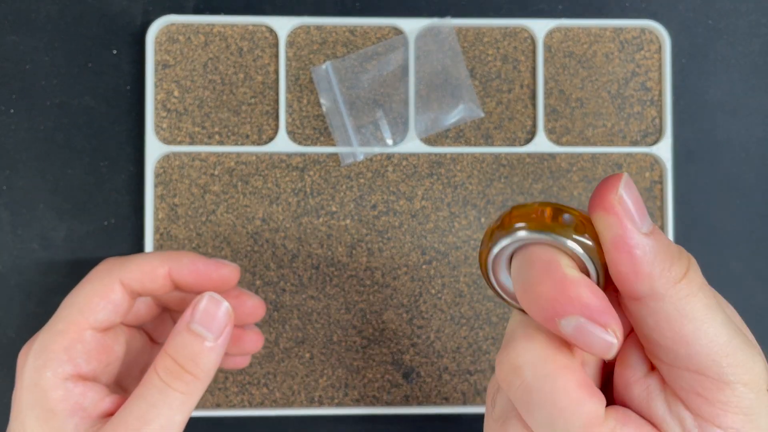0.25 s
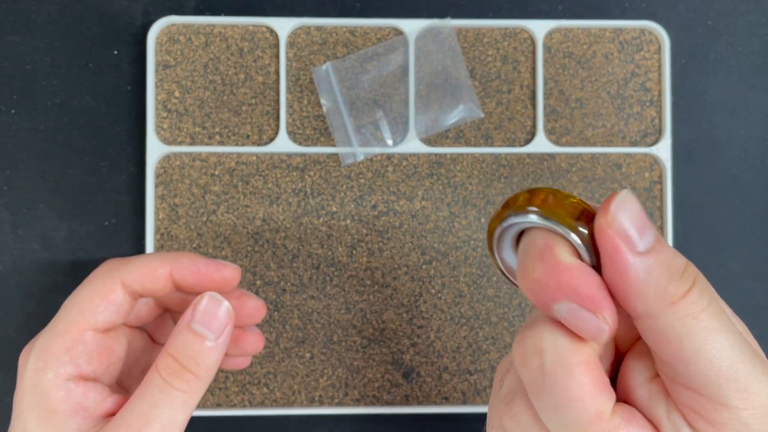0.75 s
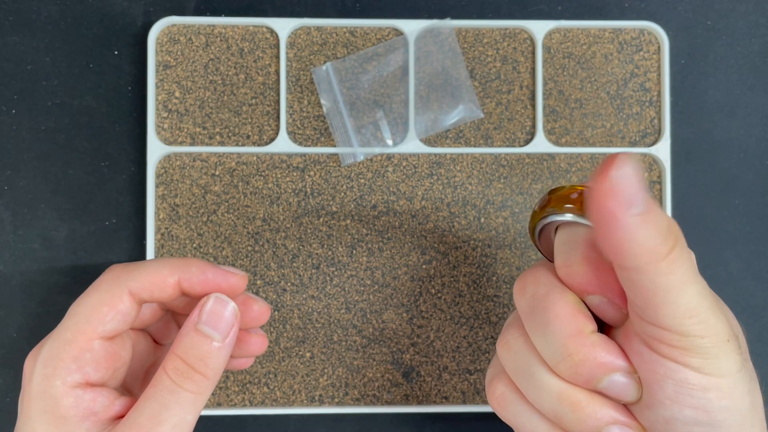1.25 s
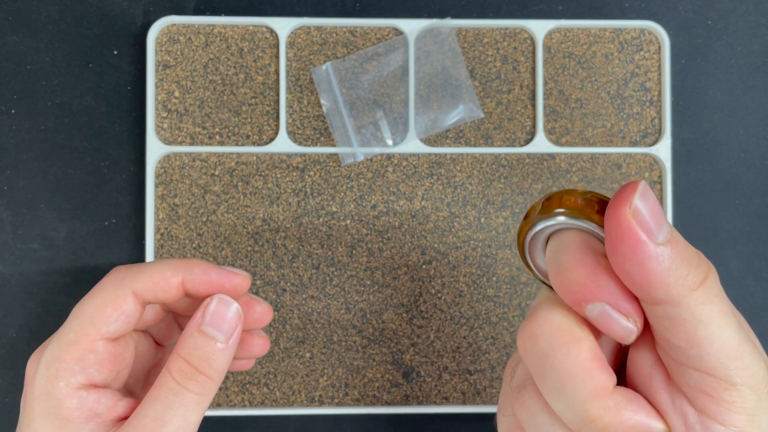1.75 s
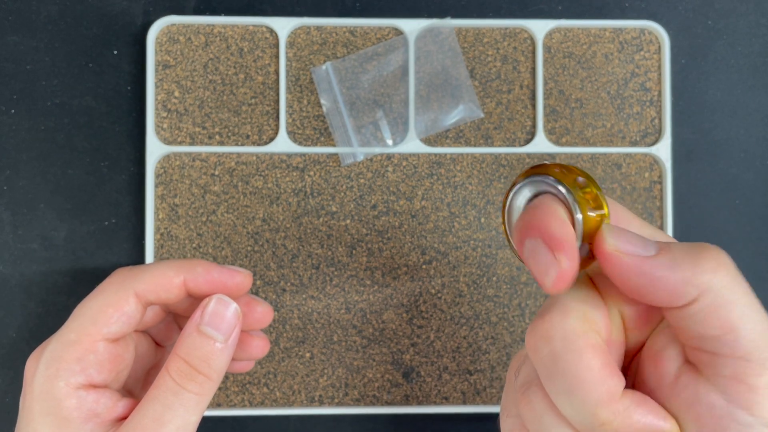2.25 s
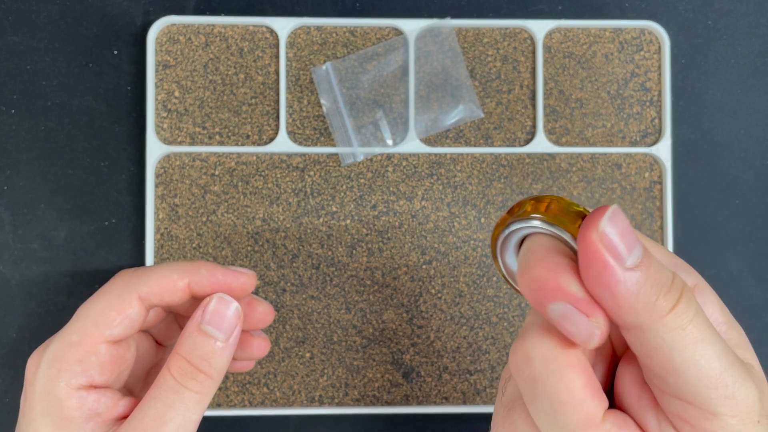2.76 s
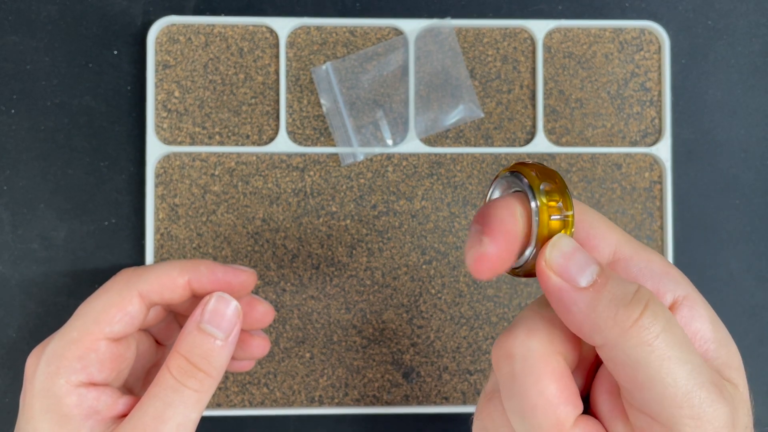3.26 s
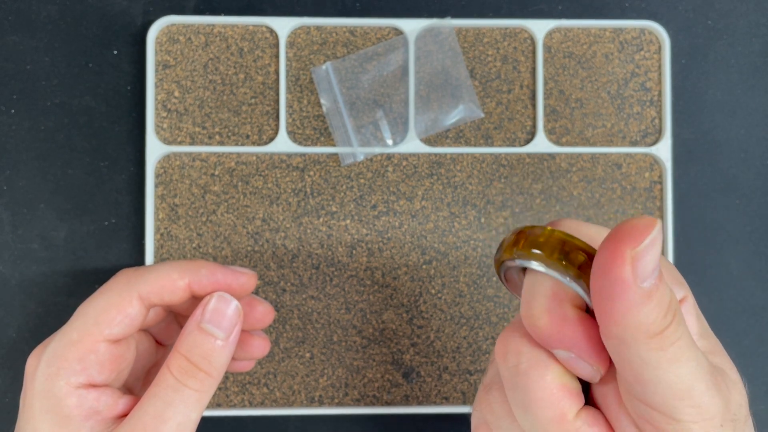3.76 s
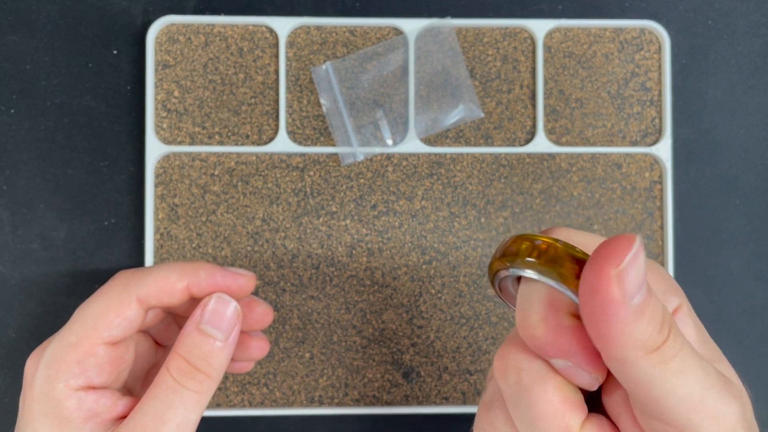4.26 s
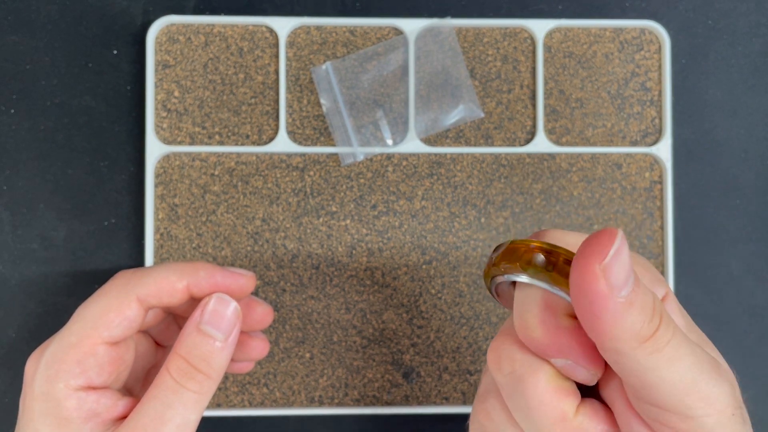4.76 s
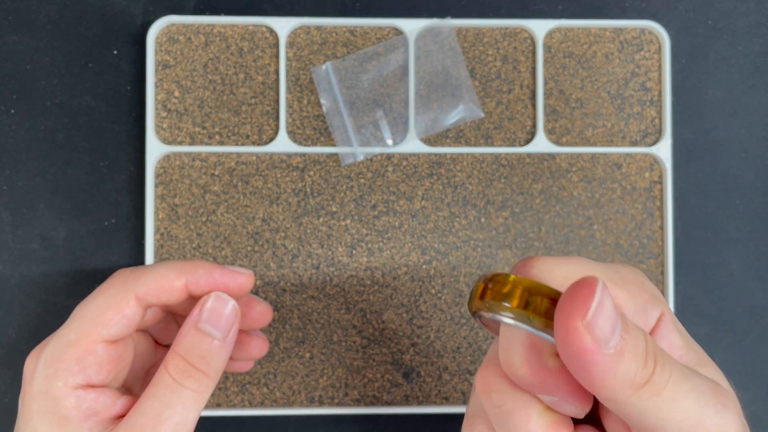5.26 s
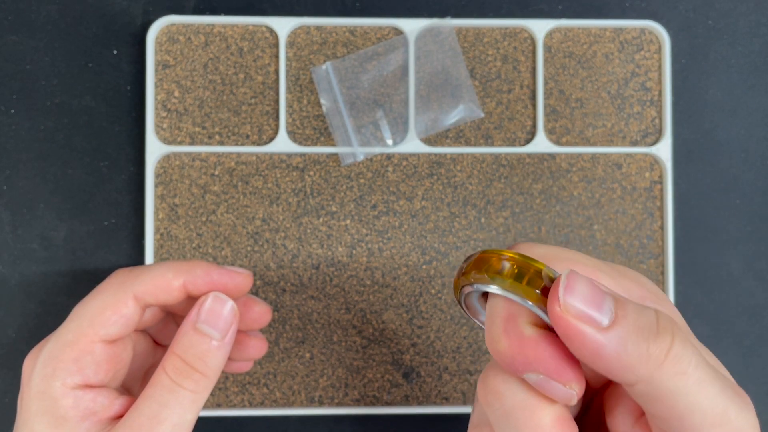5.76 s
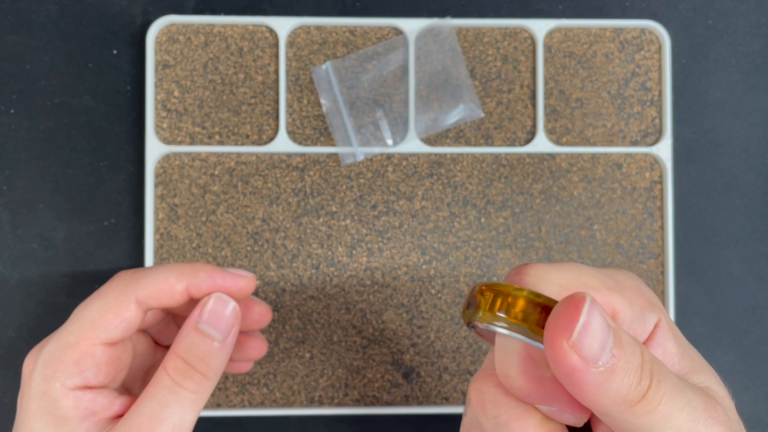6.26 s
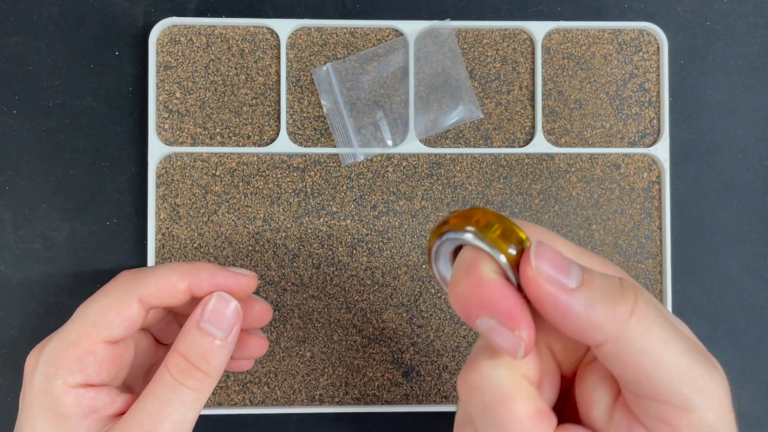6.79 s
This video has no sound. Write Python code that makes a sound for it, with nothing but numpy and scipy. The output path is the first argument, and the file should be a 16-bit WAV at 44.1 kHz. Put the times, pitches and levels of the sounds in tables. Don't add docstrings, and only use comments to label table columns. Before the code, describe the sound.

Close, sharp, dry clicks from a small clicker ring run in quick uneven flurries, broken by brief gaps of faint room tone.

```python
import sys
import numpy as np
from scipy import signal
from scipy.fft import rfft, irfft, next_fast_len
from scipy.io import wavfile
from scipy.ndimage import uniform_filter1d, map_coordinates

SR = 44100
rng = np.random.default_rng(int(sys.argv[2]) if len(sys.argv) > 2 else 0)


def to_linear_factor(level_db):
    exponent = np.asarray(level_db, float) / 20
    return 10 ** exponent


def generate_wav(sig):
    pcm = np.round(np.clip(np.atleast_2d(sig).T, -1, 1) * 32767).astype(np.int16)
    wavfile.write(sys.argv[1], SR, pcm)


N = 309889


def along(points, hz):
    f, v = np.transpose(points)
    return np.interp(np.log(hz + 1), np.log(f + 1), v)


def unit(x):
    return x / np.sqrt(np.mean(x ** 2, axis=-1, keepdims=True) + 1e-20)


def filtered(x, response):
    m = next_fast_len(N + SR // 2)
    hz = np.fft.rfftfreq(m, 1 / SR)
    return irfft(rfft(x, m) * response(hz), m)[..., :N]


def add(track, seconds, rows):
    for s, row in zip(seconds, rows):
        i = max(round(s * SR), 0)
        track[..., i:i + row.shape[-1]] += row[..., :max(N - i, 0)]
    return track


# (time [s], rumble level [dB], murmur level [dB])
ROOM_TONE = [(0.0, -56, -72.5), (0.35, -61.5, -78.5), (0.49, -69.5, -90), (1.08, -76, -88),
             (1.72, -74, -86.5), (1.94, -70.5, -79.5), (2.25, -81, -87.5), (3.4, -67, -77.5),
             (3.52, -60.5, -70), (3.68, -71, -87.5), (3.83, -76, -88.5), (4.99, -72.5, -83.5),
             (5.21, -66, -90.5), (5.52, -72, -88), (6.05, -60.5, -71.5), (6.5, -63.5, -81),
             (7.03, -59.5, -73)]
# (frequency [Hz], level [dB per Hz])
RUMBLE_COLOUR = [(32, -42.5), (46, -7), (62, 1.5), (140, -6.5), (215, -16), (400, -52)]
# (frequency [Hz], level [dB per Hz])
MURMUR_COLOUR = [(120, -11), (250, -8.5), (600, -9.5), (1200, -25), (2000, -44.5)]
# (frequency [Hz], level [dB per Hz])
HISS_COLOUR = [(500, -5), (1500, -0.5), (8700, -8.5), (11400, -12), (16000, -20)]


def air():
    def noise(colour):
        return unit(filtered(rng.standard_normal((2, N)), lambda f: to_linear_factor(along(colour, f))))

    s, rumble_db, murmur_db = np.transpose(ROOM_TONE)
    t = np.arange(N) / SR
    drift = map_coordinates(rng.standard_normal(N * 6 // SR + 4), [t * 6])
    rumble = to_linear_factor(np.interp(t, s, rumble_db) + 2.1 * drift) * noise(RUMBLE_COLOUR)
    murmur = to_linear_factor(np.interp(t, s, murmur_db)) * noise(MURMUR_COLOUR)
    return rumble + murmur + to_linear_factor(-89.0) * noise(HISS_COLOUR)


# (start [s], push level [dB], push growth [dB/s], bending over edge modes [dB])
STROKES = [(0, -44.5, -150, 4), (0.259, -27.5, -59.5, -3.5), (.66, -49, -45.5, -3),
           (1.361, -53.5, -48.5, -1), (1.689, -62.5, 27, -5), (1.96, -55.5, -1, -5.5),
           (2.52, -61.5, -1.5, -0.5), (2.679, -49.5, 6, -3.5), (3.34, -40, 10.5, 0),
           (3.509, -51.5, 14, -12.5), (4.04, -60.5, 3.5, -9.5), (4.521, -57.5, -30.5, -3.5),
           (4.98, -56.5, 28, -4), (5.68, -43.5, -29.5, -0.5), (5.919, -55, -17.5, -4), (6.16, -47, 60, -8),
           (6.87, -47, 89, -1.5)]


def stroke(s):
    starts = [row[0] for row in STROKES]
    start, push_db, grows_db, bend_db = np.array(STROKES)[np.searchsorted(starts, s) - 1].T
    return push_db + grows_db * (s - start), bend_db


# (time [s], leading bending mode [Hz], leading edge mode [Hz],
# extra bending [dB], extra push [dB])
HOLDS = [(0.019, 4130, 6220, 2.5, 1.5), (0.069, 4500, 6700, -8.5, -1.5),
         (0.172, 5230, 6950, -12, -3.5), (0.224, 5470, 6030, 7.5, -2), (0.28, 4230, 6790, -13.5, -1),
         (0.318, 4700, 6590, 11.5, 3.5), (0.353, 4890, 6160, -1.5, -2.5), (0.381, 5060, 6320, 3, 1),
         (0.418, 5120, 6240, -3.5, 0), (0.446, 4670, 5900, 4, -1), (0.47, 4740, 6540, -2.5, 0.5),
         (0.655, 5180, 6040, 6.5, -5), (0.673, 5230, 7200, 13.5, 1.5), (0.709, 5350, 7800, 4, 4),
         (0.744, 4940, 7300, -6.5, -1), (0.781, 5030, 7460, -5.5, -10), (0.811, 4970, 7600, 3, 2),
         (0.848, 5000, 7550, -6.5, 6.5), (0.887, 4480, 7430, -14, -2.5),
         (0.929, 4360, 6630, 3.5, -4.5), (0.977, 4450, 7320, 11.5, -2), (1.374, 3720, 5980, 4, 4),
         (1.41, 3880, 6010, 4.5, 2.5), (1.479, 4800, 6030, 0.5, 5), (1.521, 5230, 6730, 11.5, -10),
         (1.709, 4360, 6704, -1, -18.5), (1.732, 3730, 7640, 7, 0.5), (1.75, 4930, 6200, 3.5, 4),
         (1.788, 3990, 6120, -4.5, -10.5),
         (1.833, 4026, 6400, 1.5, 6), (1.883, 3785, 5980, -6, -0.5), (1.972, 4640, 6240, 1, -13),
               (2.021, 5270, 5810, 5, 8), (2.078, 5210, 6650, 3.5, 6), (2.107, 5210, 6850, 6.5, -1.5),
               (2.128, 5030, 6484, -12.5, -8), (2.491, 4726, 6070, 5.5, -3), (2.532, 4230, 6300, 10.5, 2.5),
               (2.575, 4390, 7300, 16.5, 12.5), (2.695, 4580, 6565, -7, -2), (2.713, 3950, 6870, 2.5, -6),
               (2.744, 4460, 6540, -1, 0), (2.783, 4160, 6600, -4.5, 0.5), (2.829, 4900, 7100, 8, -0.5),
               (2.873, 4780, 6360, 5.5, -4.5), (3.324, 4920, 6170, 7, 3), (3.354, 4920, 6160, 0.5, 2.5),
               (3.397, 4893, 5890, -3, 4), (3.434, 4984, 6130, 3.5, 4.5), (3.462, 5424, 7460, 10.5, 3),
               (3.487, 4580, 6130, -6.5, 2), (3.528, 5190, 6810, 1, 7.5), (3.579, 3380, 6955, -6, 3),
               (3.626, 3400, 6353, -2, 3.5), (3.669, 3404, 6236, 5, 0.5), (4.054, 3720, 6430, 4, -5),
         (4.096, 4100, 6060, -0.5, -3), (4.128, 3700, 6280, -2, 7), (4.153, 4040, 6220, 4.5, 2),
             (4.181, 4370, 6530, 8.5, -2.5), (4.221, 4970, 7510, -1.5, -2.5), (4.534, 4990, 6220, -12, 3.5),
             (4.552, 4580, 6980, 1, -4), (4.591, 4820, 7190, 3, -0.5), (4.62, 5100, 7610, -10.5, 1.5),
             (4.647, 4280, 6930, 2, 3), (4.676, 4300, 7330, 16, 9.5), (4.734, 4120, 7430, 4, 0.5),
             (4.989, 4870, 7540, 2, -8.5), (5.04, 3490, 6430, 5, 2.5), (5.067, 5000, 6340, 8.5, 6),
             (5.098, 3680, 7030, -9, -5), (5.124, 3700, 7470, -2, -2.5), (5.151, 3770, 7490, -4, -4),
             (5.187, 3660, 7780, 4, 1), (5.694, 3800, 6716, -17, 1), (5.802, 3880, 6366, -20, 2),
             (5.935, 4435, 6320, -3.5, 4), (6.018, 4300, 6700, 8, -2), (6.092, 4820, 6170, -12.5, 1.5),
             (6.172, 4870, 7410, -6.5, -1), (6.233, 4830, 7600, -5.5, 2), (6.294, 4360, 7560, -4, -0.5),
             (6.868, 5400, 7230, 10, 4), (6.891, 5330, 6920, 4, -1), (6.939, 4780, 7480, 5, 1.5),
             (7.01, 5380, 6860, 14, 0)]


def hold(s):
    table = np.array(HOLDS)
    nearest = np.abs(table[:, 0] - np.reshape(s, (-1, 1))).argmin(axis=1)
    return table[nearest, 1:].T


# (time [s], peak level [dB], resin over metal [dB], delay of second
# contact [ms], its peak level [dB])
NOTCH_CLICKS = [(0.019, -11, -3.5, 1.9, -17), (0.0686, -5.5, -11, 1.9, -24), (0.1715, -21.5, -15, 2.6, -32),
                (0.224, -31, -14.5, 2.4, -26), (0.2791, -11, -3, 3.7, -20), (0.3183, -14, -6, 1.4, -15.5),
                (0.3527, -10, 3, 4.1, -21), (0.3794, -9, -3, 1.6, -17.5), (0.418, -13, -2, 2.7, -22),
                (0.4452, -12, -0.5, 1.7, -14), (0.4697, -14, 0.5, 1.8, -17), (0.6726, -10.5, -1, 2.0, -8.5),
                (0.7089, -11, -2.5, 2.7, -15.5), (0.7437, -15, -5.5, 2.4, -11), (0.7806, -7, -13.5, 2.0, -15),
                (0.8103, -11.5, -6, 3.4, -13.5), (0.848, -9.5, -7, 2.5, -14), (0.886, -9, -7, 4.6, -13.5),
                (0.9295, -19.5, -3.5, 3.2, -11.5), (0.9771, -9.5, -10, 1.6, -16), (1.3737, -9, -13.5, 1.4, -22),
                (1.4093, -22, -11.5, 4.2, -24.5), (1.4792, -11.5, -6.5, 3.4, -15), (1.5208, -15, -23, 1.6, -31.5),
                (1.708, -14.5, 0, 1.1, -15.5), (1.731, -21.5, -10, 1.2, -27.5),
              (1.7489, -27, -12.5, 2.8, -37), (1.7861, -12.5, 7, 1.4, -16.5), (1.8334, -12, 11, 1.7, -14),
              (1.8836, -10, 6, 1.9, -14.5), (1.9716, -11.5, 1, 1.1, -11.5), (2.0214, -12, 2.5, 1.2, -18),
              (2.0775, -10.5, -3, 1.2, -20.5), (2.1071, -9, -2, 6.3, -28.5), (2.1282, -14.5, 4, 0.95, -12),
              (2.5317, -11.5, 2.5, 2.5, -32), (2.575, -26.5, -1.5, 1.3, -27),
              (2.6945, -13, 3.5, 1.6, -16.5), (2.7132, -19, -5, 2.0, -24.5), (2.7442, -10.5, 2.5, 0.9, -17),
              (2.7823, -12.5, 3.5, 1.0, -14.5), (2.829, -11.5, -5, 4.2, -16.5),
              (2.8736, -12, 1.5, 1.7, -15.5),
                (3.3534, -12.5, -4, 1.5, -13.5), (3.3967, -11, -5, 0.68, -10),
               (3.4336, -11.5, 2.5, 1.6, -18.5), (3.4613, -9, -2, 2.5, -15.5),
               (3.4871, -12.5, 0.5, 1.1, -7), (3.5277, -11.5, 3.5, 2.4, -12), (3.5793, -8.5, 2, 2.9, -11.5),
               (3.6262, -12, -1, 2.2, -10.5), (3.6685, -13, -0.5, 5.4, -13), (4.0534, -6, -4.5, 2.1, -12),
               (4.0964, -7, 0, 2.9, -15.5), (4.1279, -6, -3, 2.2, -13.5), (4.1528, -9, 3, 2.4, -17),
               (4.1814, -12.5, -6.5, 2.6, -11.5), (4.2213, -9.5, -6, 3.5, -18),
               (4.5342, -9.5, -7, 2.4, -14.5), (4.5523, -14.5, -7.5, 1.9, -7.5),
               (4.5876, -10, -11, 2.9, -7.5), (4.6173, -10, -8, 1.6, -11), (4.6468, -9, -10, 3.2, -15.5),
               (4.6759, -18.5, -0.5, 3.1, -11), (4.7313, -17.5, -2, 2.9, -14),
                (4.9881, -19, -19, 1.9, -31), (5.0016, -20, -10, 9.9, -33), (5.0412, -7.5, -9, 2.6, -23),
              (5.0665, -9.5, -6, 2.0, -16), (5.0976, -13.5, 2, 1.2, -14.5),
              (5.1236, -14.5, -6.5, 4.0, -11.5), (5.1496, -10, 1, 2.0, -13),
              (5.1879, -11, -5.5, 3.5, -11.5), (5.6936, -9.5, -1.5, 2.5, -18.5),
              (5.6998, -24.5, -5.5, 3.5, -16.5), (5.8011, -7, -7, 2.2, -20.5),
              (5.8106, -19.5, 0.5, 4.2, -22.5), (5.9327, -12.5, -1, 1.5, -15.5),
              (5.9444, -22.5, -2, 2.6, -19.5), (6.0177, -8.5, -6.5, 6.3, -15.5),
              (6.0921, -8.5, -5.5, 7.6, -13.5), (6.1726, -8, -8.5, 5.5, -14),
              (6.232, -10.5, -5.5, 1.3, -12.5), (6.293, -9.5, -3.5, 8.7, -14),
              (6.8885, -10.5, -6.5, 2.0, -12.5), (6.938, -12, -1, 2.9, -17),
              (7.0096, -10.5, -3, 2.5, -17.5)]
CLICKS = NOTCH_CLICKS
# (time [s], peak level [dB], resin over metal [dB])
TICKS = [(0.618, -49.5, 19), (0.629, -44, 7), (.642, -42.5, -4), (0.6545, -36.5, 7), (1.2476, -45, 29),
         (0.9886, -19.5, -7), (1.2729, -45, 11), (1.2884, -49, 7), (1.321, -47.5, 1), (1.3462, -53.5, 1),
         (1.4336, -44.5, 3.5), (1.551, -47.5, 25), (1.6892, -54, -4.5), (1.8009, -22.5, -6.5),
         (1.852, -24, -5.5), (1.91, -27.5, -1.5), (2.2606, -42, 2.5), (2.469, -47, 27), (2.491, -37.5, 3),
         (3.2817, -51, 7), (3.29, -43, 9), (3.325, -32.5, -11.5), (3.71, -40, 13.5), (4.0346, -43.5, 17),
         (4.5248, -31, 5.5), (6.5012, -58.5, 11), (6.508, -63, 7), (6.652, -57.5, 22), (6.869, -33, -5)]
TICKS_AND_LANDINGS = TICKS + [(.3217, -23, -6), (.8527, -15, -8), (.8892, -18, -7.5), (1.8401, -19, 4),
                      (1.9757, -16.5, 3.5), (2.0243, -14.5, -0.5), (4.2275, -19, -9), (5.1023, -14, -1),
                      (5.1312, -22.5, -0.5), (6.2377, -11, -7)]


def strikes():
    rattles, wait_s = 3, 0.002
    loss_db, scatter_db = 9.5, 5
    bend_scatter_db, second_bend_db = 0.5, 1.5
    s, db, resin_db, after_ms, second_db = np.transpose(CLICKS)
    chance = rng.standard_normal((len(s), 2 + 2 * rattles)).T
    bend_db = stroke(s)[1]
    drop = (s, db, resin_db, bend_db + bend_scatter_db * chance[0])
    landing = (s + after_ms / 1000, second_db, resin_db - 7.5,
               bend_db + second_bend_db + bend_scatter_db * chance[1])
    rows = [drop, landing]
    for k, (wait, scatter) in enumerate(chance[2:].reshape(rattles, 2, -1)):
        when = rows[-1][0] + wait_s * to_linear_factor(2 * wait)
        level = np.minimum(db, second_db) - loss_db * (k + 1) + scatter_db * scatter
        rows.append((when, level, resin_db + 0.5, bend_db + second_bend_db))
    ticks = np.transpose([(*tick, -2) for tick in TICKS_AND_LANDINGS])
    return np.hstack([np.array(row) for row in rows] + [ticks])


def modes(table, hz, spread_db, count):
    chance = rng.standard_normal((count, len(table), 2))
    total = 0
    for k, (centre, width, db) in enumerate(table):
        width = max(width, 450)
        c = centre * (1 + 0.018 * chance[:, k, :1])
        strength = (-1) ** k * to_linear_factor(db + spread_db * chance[:, k, 1:])
        total = total + strength * 1j * hz * width / (c * c - hz * hz + 1j * hz * width)
    return total


def even(body):
    return body / np.linalg.norm(body, axis=1, keepdims=True)


def blend(a, b, a_db):
    return (to_linear_factor(a_db) * even(a) - even(b)) / np.sqrt(1 + to_linear_factor(2 * a_db))


def bursts(count, t):
    size = len(t)
    rise = to_linear_factor(t / .000025) + to_linear_factor(-28 + t / .0002)
    fall = to_linear_factor(-t / 0.00016) + to_linear_factor(-18.0 - t / 0.00016)
    shape = np.where(t < 0, rise, fall)
    chatter = to_linear_factor(4.5 * unit(uniform_filter1d(rng.standard_normal((count, size)), size=12)))
    blow = 3.2 * (np.arange(size) == np.argmax(t >= 0)) * [[1], [0]]
    burst = rfft(rng.standard_normal((count, 2, size)) * (shape * chatter)[:, None] + blow)
    return burst / uniform_filter1d(np.abs(burst), size=15) ** .5


# (frequency [Hz], width [Hz], level [dB])
SHELL_BENDING = [(2600, 880, -15.5), (3500, 780, -7.5), (4166, 970, -0.5), (5007, 700, 1.5)]
# (frequency [Hz], width [Hz], level [dB])
SHELL_EDGE = [(6124, 440, -2.5), (6349, 570, 0.5), (7150, 330, -9)]
# (frequency [Hz], width [Hz], level [dB])
STEEL_RACE = [(8500, 1300, -7.5), (11050, 900, 1.5), (12000, 900, -4), (14350, 900, -10), (15350, 800, -10)]


def contacts():
    s, db, resin_db, deep_db = strikes()[:, :, None]
    count, size = len(s), 1024
    t = np.arange(size) / SR - .004
    hz = np.fft.rfftfreq(size, 1 / SR)
    burst = bursts(count, t)

    def lead(c, level_db):
        return to_linear_factor(level_db) * even(1j * hz / (c * c - hz * hz + 1j * hz * 360))

    bend_hz, edge_hz, extra_db, _ = hold(s)[:, :, None]
    bending = even(modes(SHELL_BENDING, hz, 5.5, count))
    edge = even(modes(SHELL_EDGE, hz, 2.0, count))
    metal = modes(STEEL_RACE, hz, 3.5, count)
    shell = blend(bending + lead(bend_hz, 2.5), edge + lead(edge_hz, 1.5),
                  0.7 * deep_db + 0.34 * extra_db + 0.14)
    body = blend(shell, metal, 0.76 * resin_db - .8)
    plain_shell = blend(bending, edge, 1.2 * deep_db + 4.0)
    plain = blend(plain_shell, metal, 0.53 * resin_db - .8)
    radiation = 1 / (1 + (1300 / (1j * hz + 1)) ** 2 + 1850 / (1j * hz + 1))
    bodies = np.stack([body, body, plain], axis=1)
    sound = irfft(burst[:, [0, 1, 1]] * bodies * radiation, size)
    swell = np.sqrt(np.abs(uniform_filter1d(sound[:, 0] ** 2, size=24)))
    starts = s[:, 0] - swell.argmax(axis=1) / SR - .0002
    gain = to_linear_factor(db - 7.0) / swell.max(axis=1, keepdims=True)
    return add(np.zeros((3, N)), starts, sound * gain[:, None])


# (frequency [Hz], level [dB per Hz])
JOLT_COLOUR = [(22, -35.5), (40, -9), (120, -4), (400, -3.5), (900, -7), (2000, -11.5), (4000, -11.5)]


def jolts():
    s, db, *_ = np.transpose(CLICKS)
    weak_db = np.minimum(db + 14, 0)
    push_db = stroke(s)[0] + hold(s)[3] + 1.5 * weak_db + 0.3 * rng.standard_normal(len(s))
    pushes = add(np.zeros(N), s - .001, to_linear_factor(push_db + 34.5)[:, None])
    add(pushes, s - .0008, to_linear_factor(db - 37.5)[:, None])
    return filtered(pushes, lambda f: to_linear_factor(along(JOLT_COLOUR, f))) * np.ones((2, 1))


# (frequency [Hz], time to fall by 60 dB [s])
ROOM_DECAY = [(300, 0.6), (2600, 0.34), (7000, 0.35), (11000, 0.3), (13000, 0.14), (14500, 0.3)]


def room(x, level_db):
    out, step = np.zeros((2, N)), SR // 4
    for i in range(0, N, step):
        hz, t, z = signal.stft(rng.standard_normal((2, SR // 2)), SR, nperseg=256)
        hz = hz[:, None]
        dull_db = -9 * (hz > 12600)
        warm_db = 1.5 * (hz < 3547)
        decay = to_linear_factor(-60 * t / along(ROOM_DECAY, hz) + dull_db + warm_db)
        tail = signal.istft(z * decay, SR, nperseg=256)[1]
        tail = tail / np.linalg.norm(tail[0])
        answer = signal.fftconvolve(x[None, i:i + step], tail, axes=1)
        add(out, [i / SR + 0.0033], [answer])
    return to_linear_factor(level_db) * out


# (time [s], low ring level [dB], high ring level [dB], share of the free decay time [0-1.5])
LOOSE_BAND = [(0.468, -74, -64, 0.66), (.977, -82.5, -64.5, 0.62), (1.478, -74.5, -61, 0.51),
              (2.132, -82, -48, 0.88), (2.875, -88, -53, 1.44), (3.353, -65.5, -67, 0.81),
              (3.529, -56.5, -64.5, 0.94), (4.223, -79.5, -60, 0.6), (4.551, -67.5, -42, 0.48),
              (4.734, -64.5, -50.5, .95), (5.038, -59.5, -51, 0.89), (5.189, -66, -62, 0.28),
              (6.016, -61, -64, 0.42), (6.095, -65, -64, 0.75), (6.295, -61.5, -53, 0.7)]
# (frequency [Hz], time to fall by 60 dB [s], waver [dB], waver [radians])
BAND_TONES = [
    (2519, 0.55, 4, .5),
    (4815, 0.26, 3.5, .6),
]


def rings():
    t = np.arange(SR // 2) / SR
    s, *level_db, share = np.transpose(LOOSE_BAND)[:, :, None]
    track = np.zeros(N)
    for (hz, t60, waver_db, slip), db in zip(BAND_TONES, level_db):
        waver = unit(uniform_filter1d(rng.standard_normal((len(s), len(t))), size=1500))
        level = to_linear_factor(db + waver_db * waver - 60 * t / (t60 * share))
        tone = np.sin(2 * np.pi * hz * t + slip * waver[::-1])
        add(track, s[:, 0], level * tone)
    return track


# (time [s],
# frequency [Hz], level [dB], time to fall by 60 dB [s])
BLIPS = [
    (.6722, 3300, -24, .03),
    (2.81, 58, -53, .6),
    (5.42, 58, -49, .6),
    (6.225, 62, -39, .35),
    (6.474, 1720, -68, .05),
    (6.648, 2300, -58, .006),
    (6.67, 600, -63, .1),
]


def blips():
    t = np.arange(SR // 2) / SR
    s, hz, db, t60 = np.transpose(BLIPS)[:, :, None]
    level = to_linear_factor(db - 60 * t / t60) * (1 - np.exp(-t * hz / 3)) ** 2
    return add(np.zeros(N), s[:, 0], level * np.sin(2 * np.pi * hz * t))


# (frequency [Hz], level [dB], likeness [0-1])
NEAR = [(100, 0, 0.94), (590, -5.5, .95), (1090, -27, 0), (1270, -9.5, 0.2), (2001, -7, 0.2),
        (2580, -10, 1), (3294, -5.5, 0.93), (4970, -6, 0.4), (7267, -7, 0.9), (7300, 3, 0.97),
        (9600, -2, 0.985), (15810, 1.5, 0.985)]
# (frequency [Hz], phase [radians])
LEFT_LEAD = [(60, 0), (600, -.65), (1150, .7), (2000, 0), (2700, -1.4), (3500, .1), (5300, -1), (7050, 0),
             (7750, 2.8), (8350, 3.2), (8800, 3.5), (9130, 4), (15500, 12.5)]


def stereo(pair, alike, left_db=1):
    hz, db, _ = np.transpose(NEAR)

    def left_response(f):
        share = np.clip(along(alike, f), 0, 1)
        phase = np.interp(f, *np.transpose(LEFT_LEAD))
        turn = to_linear_factor(left_db * np.interp(f, hz, db)) * np.exp(1j * phase)
        return turn * [share, np.sqrt(1 - share ** 2)]

    left = filtered(pair, left_response).sum(axis=0)
    return np.array([left, pair[0]])


# (frequency [Hz], likeness [0-1])
DIFFUSE = [(60, 0.91), (150, 1), (300, 0), (640, 0.3), (7000, 0.4), (8000, 0.88), (16000, 0.86)]


def scene():
    ring = contacts() + rings() + blips()
    hand = jolts()
    near = stereo(ring[:-1] + hand, [(hz, alike) for hz, _, alike in NEAR])
    walls = room(ring[-1] + 0.65 * hand[0], level_db=-18.5)
    return near + stereo(walls, DIFFUSE, left_db=0.26) + stereo(air(), DIFFUSE, left_db=0.0)


def roll_off(x):
    return signal.sosfilt(signal.butter(12, 16970, fs=SR, output="sos"), x)


# (frequency [Hz], level [dB])
MICROPHONE_EDGE = [(15300, 3), (16000, -9), (16600, -13), (17100, -54)]


def record(dry):
    cycles = 1.1

    def chain(f):
        phase = -2j * np.pi * cycles * np.log(np.maximum(f, 20))
        return to_linear_factor(along(MICROPHONE_EDGE, f)) * np.exp(phase)

    mix = filtered(dry, chain)
    return roll_off(mix)


dry = scene()
out = record(dry)
generate_wav(out)
```